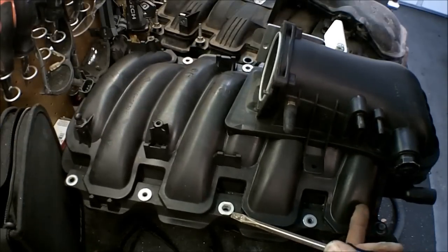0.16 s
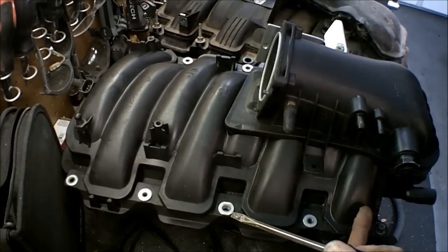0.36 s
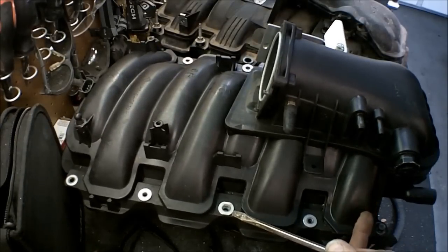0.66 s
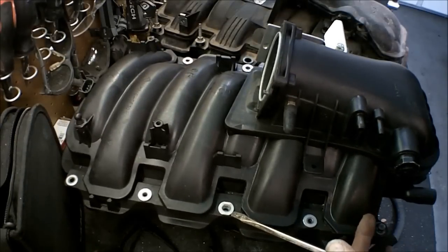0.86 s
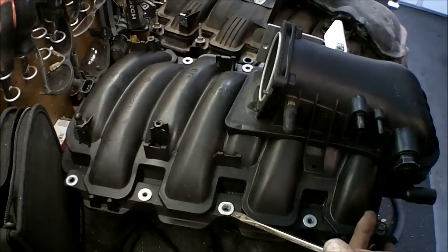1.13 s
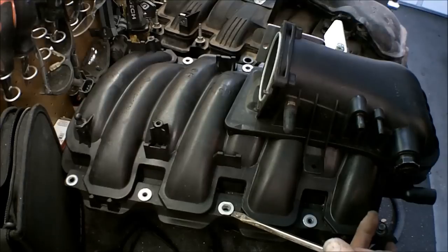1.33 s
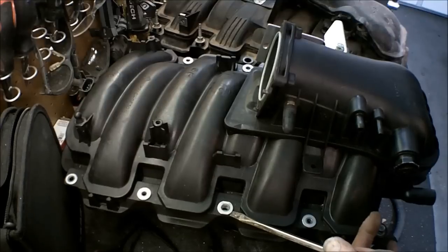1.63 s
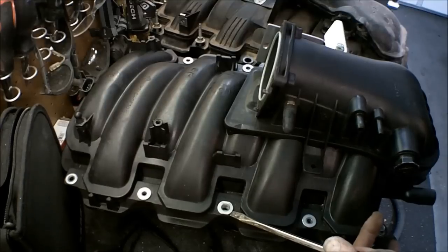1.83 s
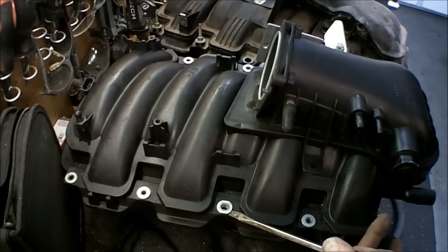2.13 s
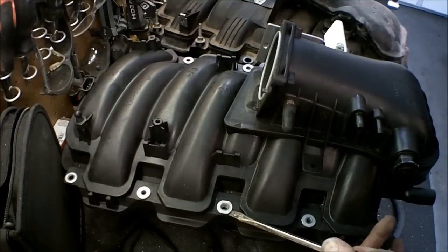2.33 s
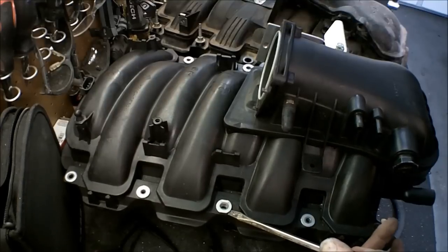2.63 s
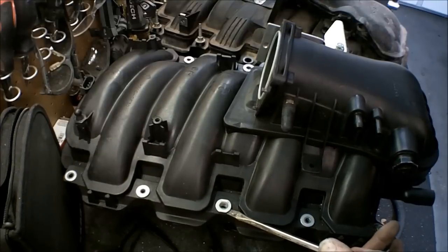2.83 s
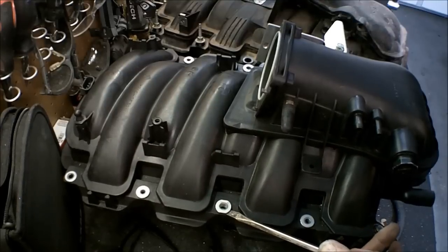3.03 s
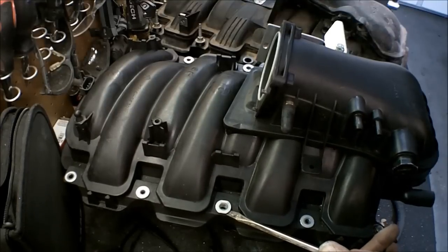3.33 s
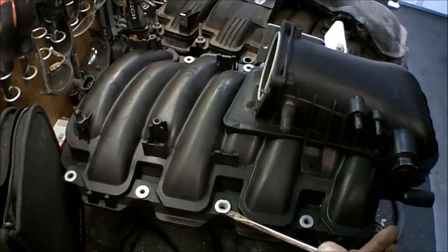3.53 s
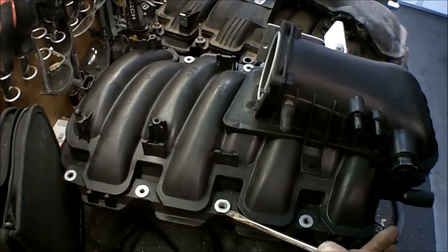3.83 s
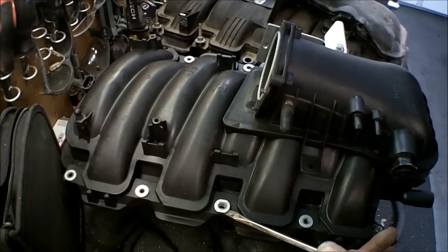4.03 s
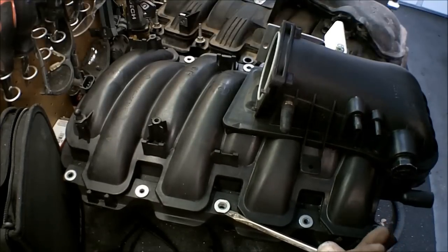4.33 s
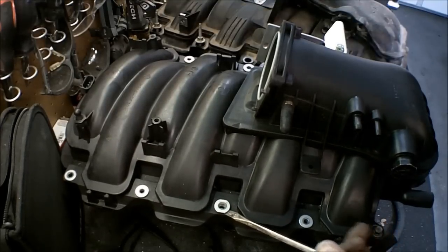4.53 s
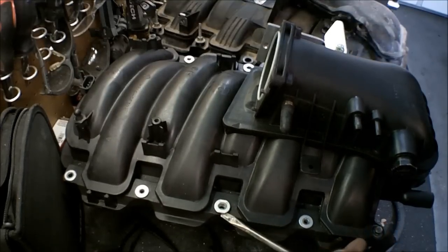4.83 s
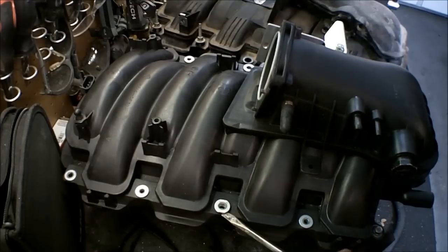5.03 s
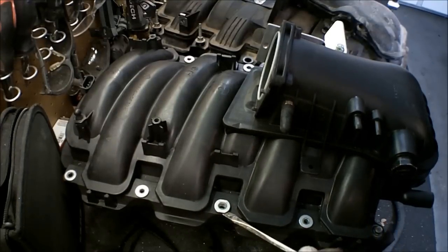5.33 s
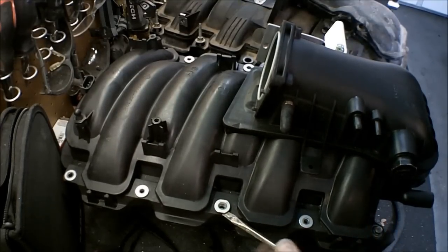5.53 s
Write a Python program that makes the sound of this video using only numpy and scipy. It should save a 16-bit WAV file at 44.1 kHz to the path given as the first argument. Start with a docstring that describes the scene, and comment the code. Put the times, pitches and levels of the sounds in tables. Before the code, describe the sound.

Close, sharp cracks of metal levered out of plastic come in an uneven series, followed by lighter knocks, scraping and a brief shudder.

```python
"""A small workshop: at the bench, a screwdriver levers a steel sleeve out of a plastic intake manifold.
The sleeve gives way in loud snaps, each a crack plus the ringing modes of shell, sleeve and blade.
A limiter ducks each snap and lets the room swell back. Between snaps the blade knocks and scrapes;
near the end it slips off and the manifold rocks and shudders on the bench. Air and mains hum lie below."""
import sys
import numpy as np
from scipy import signal
from scipy.fft import rfft, irfft
from scipy.io import wavfile
from scipy.ndimage import uniform_filter1d, minimum_filter1d

SR = 44100
rng = np.random.default_rng(int(sys.argv[2]) if len(sys.argv) > 2 else 0)


def master(y):
    """Save y as 16-bit WAV."""
    cut = np.clip(np.atleast_2d(y).T, -1, 1)
    pcm = np.round(cut * 32767)  # scale
    wavfile.write(sys.argv[1], SR, pcm.astype(np.int16))


N = 250484


def amp(db):
    """Decibels to gain."""
    return 10 ** (np.asarray(db) / 20)


def unit_rms(x):
    """Scales to rms 1."""
    return x / np.sqrt(np.mean(x ** 2) + 1e-20)


def curve_at(points, hz):
    """Interpolates over log frequency."""
    points_hz, values = np.transpose(points)
    return np.interp(np.log(hz + 1), np.log(points_hz + 1), values)


def add(mix, start_s, sound):
    """Mixes a sound in at start_s."""
    part = mix[max(round(start_s * SR), 0):][:len(sound)]
    part += sound[:len(part)]


def coloured(x, gain_db, size=4096):
    """Minimum-phase filter with response gain_db(hz)."""
    log_gain = np.log(amp(gain_db(abs(np.fft.fftfreq(size, 1 / SR)))))
    taps = np.fft.ifft(np.exp(np.conj(signal.hilbert(log_gain)))).real[:size // 2]
    fade = signal.windows.tukey(size, .5)[size // 2:]
    return signal.oaconvolve(x, taps * fade)[:len(x)]


def ringing(modes, t):
    """One decaying sine per mode, as rows."""
    hz, level_db, t60_s = np.transpose(modes)[:, :, None]
    return amp(level_db) * np.exp(-np.log(1000) * t / t60_s) * np.sin(2 * np.pi * hz * t)


# Air noise spectrum: freq_hz, gain_db
AIR_SPECTRUM = [(12, -34), (20, -2.5), (68, 1), (163, -13), (241, -15.5), (399, -20.5), (678, -23.5),
                (2140, -33), (2750, -38.5), (3070, -35), (4180, -31.5), (5530, -41), (15200, -46.5),
                (16000, -64)]
# Mains partials: pitch_hz, level_db
MAINS_HUM = [(59.2, -52), (118.5, -64.5), (237, -66)]


def background(air_db=-50.5):
    """Steady room air and mains hum."""
    air_gain = amp(curve_at(AIR_SPECTRUM, np.fft.rfftfreq(N, 1 / SR)))
    air = irfft(rfft(rng.standard_normal(N)) * air_gain, N)
    t = np.arange(N) / SR
    hum = sum(amp(db) * np.sqrt(2) * np.sin(2 * np.pi * (hz * t + rng.random())) for hz, db in MAINS_HUM)
    return amp(air_db) * unit_rms(air) + hum


def friction(strokes, gain_db, slips_per_s, spread_db, swing_db=20):
    """Tiny uneven slips; each stroke rises swing_db over build_s and falls as much over release_s."""
    sizes = amp(spread_db * np.minimum(rng.exponential(1, N), 4))
    slips = (rng.random(N) < slips_per_s / SR) * rng.choice([-1, 1], N) * sizes
    t = np.arange(N) / SR
    pressure = sum(amp(level_db - swing_db * np.maximum((peak_s - t) / build_s, (t - peak_s) / release_s))
                   for peak_s, level_db, build_s, release_s in strokes)
    return unit_rms(coloured(slips, gain_db)) * pressure


# Contact spectrum: freq_hz, gain_db
CONTACT_SPECTRUM = [(40, -9), (110, -11.5), (190, -6.5), (320, -3), (620, -10.5), (850, -6), (1050, 1),
                    (1450, -2.5), (1750, 0), (3300, -5.5), (4800, -2), (5600, -11), (9000, -22.5),
                    (14000, -21.5)]


def contact_db(hz):
    """Response of the part's dense modes to a contact."""
    return curve_at(CONTACT_SPECTRUM, hz)


# Blade strokes: peak_s, level_db, build_s, release_s
SCRAPE_STROKES = [(0.016, -46.5, 0.022, 0.08), (0.926, -46.5, 0.049, 0.04), (1.1, -56.5, 0.12, 0.25),
                  (4.285, -62, 0.06, 0.15), (4.494, -48.5, 0.0046, 0.38), (4.592, -40.5, 0.022, 0.18),
                  (4.79, -36.5, 0.095, 0.075), (5.052, -45, 0.051, 0.06), (5.607, -33.5, 0.035, 0.07)]


def scrape():
    """The blade sticks and slips across the plastic shell."""
    tilt = [(1500, -4), (4500, 2.5), (9500, -5.5), (13000, -21.5)]  # freq_hz, gain_db
    gain_db = lambda hz: contact_db(hz) + curve_at(tilt, hz)
    return friction(SCRAPE_STROKES, gain_db, slips_per_s=2400, spread_db=3.0)


# Room decay: freq_hz, t60_s
ROOM_DECAY = [(100, 0.48), (300, 0.2251), (1300, 0.4326), (4000, 0.405), (7000, 0.39), (14000, 0.1051)]
# Room response: freq_hz, gain_db
ROOM_SPECTRUM = [(50, -2.5), (112, 13.5), (190, -9), (330, 1.5), (620, -9), (920, 0), (1130, -4.5),
                 (1360, 2.5), (1600, -4.5), (2100, -3.5), (4600, -5), (6500, -14.5), (9000, -13.5),
                 (13000, -26)]


def workshop(x, first_echo_s=0.00043, size=32768):
    """Dense reflections, each band decaying at its own rate."""
    hz, t, bands = signal.stft(rng.standard_normal(size), SR, nperseg=256)
    decay = np.exp(-np.log(1000) * t / curve_at(ROOM_DECAY, hz)[:, None])
    tail = signal.istft(bands * decay, SR, nperseg=256)[1]
    tail *= np.clip(np.arange(len(tail)) / SR / first_echo_s - 1, 0, 1)
    tail = coloured(tail / np.linalg.norm(tail), lambda hz: curve_at(ROOM_SPECTRUM, hz))
    return signal.fftconvolve(x, tail)[:N]


def chatter(t, chatter_s, grit=0.24, edge_hz=7000, size=2048):
    """Whitened micro-impacts that stop as the blade seats; the treble edge dies first."""
    impacts = rng.standard_normal(len(t)) * np.exp(grit * rng.standard_normal(len(t)) - t / chatter_s)
    power = uniform_filter1d(abs(rfft(impacts[:size])) ** 2, size=5)
    bins_hz = np.fft.rfftfreq(size, 1 / SR)
    white = coloured(impacts, lambda hz: -10 * np.log10(np.interp(hz, bins_hz, power) + 1e-9))
    dull = irfft(rfft(white) / (1 + (np.fft.rfftfreq(len(t), 1 / SR) / edge_hz) ** 10), len(t))
    edge = white - dull
    return dull * np.exp(-(t / (10 * chatter_s)) ** 2) + edge * np.exp(-(t / (3 * chatter_s)) ** 2)


# Modes of shell, sleeve and blade: pitch_hz, level_db, t60_s
PART_MODES = [(179, -30, 0.13), (283, -38.5, 0.33), (332, -20.5, 0.007), (772.5, -24, 0.17),
              (952.5, -6, 0.035), (1090, -2, 0.022), (1145, -19, 0.05), (1315, -22, 0.099),
              (1440.5, -2.5, 0.031), (1380, -20, 0.0068), (1700, -20, 0.11), (1955, -6, 0.038),
              (2153, -11.5, 0.048), (2250, -8.5, 0.0022), (3194, -15.5, 0.056), (3345, 2.5, 0.013),
              (3784, -4.5, 0.039), (4158, -7.5, 0.024), (4914, -13, 0.083), (6400, -12.5, .012),
              (6855, -10.5, 0.015)]


def blows(hits, ring_db, room_db, runners_db, room_ring_db=-7, lift_octaves=.13, size=12000):
    """Crack plus modes, coloured by the contact point; the hollow runners sound near 850 Hz."""
    t = np.arange(size) / SR
    direct, to_room = np.zeros(N), np.zeros(N)
    modes = ringing(PART_MODES, t) * (-1) ** np.arange(len(PART_MODES))[:, None]
    for start_s, force_db, thud_db, shell_db, steel_db, edge_db, chatter_s, lift_hz, lift_db in hits:
        crack = unit_rms(coloured(chatter(t, chatter_s), contact_db))
        ring = unit_rms(amp(rng.standard_normal(len(modes))) @ modes)
        hollow_db = (thud_db + shell_db) / 4 + runners_db
        colour = [(350, thud_db), (570, thud_db / 2 - runners_db), (790, hollow_db), (950, hollow_db),
                  (1300, shell_db), (2000, 0), (2500, 0), (4400, steel_db), (10000, edge_db)]
        # Each contact point favours one resonance.
        peak_db = lambda hz: lift_db / (1 + (np.log2((hz + 1) / lift_hz) / lift_octaves) ** 2)
        # The room hears all sides of the part, so single modes stand out less.
        for mix, modes_db in ((direct, ring_db), (to_room, room_ring_db)):
            blow = coloured(crack + amp(modes_db) * ring, lambda hz: curve_at(colour, hz) + peak_db(hz))
            blow *= np.sqrt(0.0096 * SR / np.sum(blow ** 2))  # energy of 9.6 ms at rms 1
            add(mix, start_s, amp(force_db) * blow)
    return direct + amp(room_db) * workshop(to_room)


# Blade knocks: start_s, force_db, hardness_db, chatter_s, lift_hz, lift_db
BLADE_KNOCKS = [(0.3253, -17, -5, 0.013, 925, 1.5), (0.842, -37, -3, 0.011, 740, 20.5),
                (0.93, -27.5, -5, 0.011, 990, 0), (1.024, -37, -7.5, 0.027, 1310, 3),
                (1.2397, -8, -4, 0.0074, 896, 5.5), (4.591, -28, -0.5, 0.055, 3300, 8),
                (4.6214, -9.5, 3.5, 0.0063, 1513, 18.5), (4.63, -18, 12.5, 0.0036, 1450, 15),
                (4.701, -25, 3, 0.0088, 1900, 1), (4.779, -20, -0.5, 0.0045, 1490, 15.5),
                (4.976, -37, -4, 0.01, 940, 0), (4.988, -39.5, -3, 0.0017, 1220, 26),
                (5.0253, -21, -1, 0.0086, 1606, 11.5), (5.308, -50.5, 6.5, 0.0019, 4050, 10),
                (5.3302, -33, 0.5, 0.011, 1930, -3), (5.3635, -37, 4, 0.0019, 2065, 12.5),
                (5.571, -35, -1, 0.012, 810, 15), (5.584, -24.5, -2, 0.038, 1620, 1.5),
                (5.599, -11.5, 2.5, 0.0047, 1570, 8.5)]
# Knock colour, rows thud, shell, steel, edge: base_db, db_per_hardness_db
KNOCK_BANDS = [(-0.5, -1.65), (-7.5, -1.43), (-5, 0.87), (-16.5, 1.8)]


def knocks():
    """The blade hits plastic or steel; a harder touch trades thud and shell for steel and edge."""
    hits = []
    for start_s, force_db, hardness_db, chatter_s, lift_hz, lift_db in BLADE_KNOCKS:
        bands_db = [base_db + slope * hardness_db for base_db, slope in KNOCK_BANDS]
        hits.append((start_s, force_db, *bands_db, chatter_s, lift_hz, lift_db))
    return blows(hits, ring_db=-2.5, room_db=-8, runners_db=2.54)


# Sleeve slips: start_s, force_db, shell_db, steel_db, lift_hz, lift_db
SLEEVE_SNAPS = [(0.4211, 4, -7.5, 3.5, 2100, 5.5), (1.5647, 15.5, 5.5, -5, 1085, 5),
                (2.0410, 15.5, 8.5, 0, 1097, 2), (2.4151, 15.5, 3.5, -1.5, 1065, 7.5),
                (2.7749, 16.5, -6, 5, 938, 8.5), (3.3772, 13.5, 1.5, 4.5, 1110, 8.5),
                (3.6501, 14, 6.5, 1, 1750, 2.5), (3.8627, 13, 7, -2, 1670, 0)]


def snaps(full_force_db=16.5, full_chatter_s=0.0031, db_per_halving=15.5):
    """The sleeve gives way; more force means shorter chatter, more thud and more edge."""
    hits = []
    for start_s, force_db, shell_db, steel_db, lift_hz, lift_db in SLEEVE_SNAPS:
        excess_db = force_db - full_force_db
        thud_db = 1.24 + 0.8 * excess_db + 0.55 * shell_db
        edge_db = -0.5 + 0.7 * excess_db + 0.83 * steel_db
        chatter_s = full_chatter_s * 2 ** (-excess_db / db_per_halving)
        hits.append((start_s, force_db, thud_db, shell_db, steel_db, edge_db, chatter_s, lift_hz, lift_db))
    return blows(hits, ring_db=-1.0, room_db=-14.0, runners_db=-2)


# Drops onto the bench: start_s, level_db, lowest_mode_db
BENCH_BUMPS = [(4.624, -23.5, -13), (4.653, -27, 16.5), (4.772, -31.5, 29), (4.787, -23, -5),
               (4.819, -29.5, -16), (5.025, -36, -6)]
# Modes of the manifold on the bench: pitch_hz, level_db, t60_s
BENCH_MODES = [(48.8, -14.5, 0.43), (84.8, -7, 0.1), (114.6, 5, 0.14), (159.6, -2.5, 0.18),
               (198.5, -2, 0.35), (244, -5, 0.17), (509, 4.5, 0.066)]


def bumps(size=20000):
    """The manifold rocks; each landing rings its low modes on the bench."""
    modes = ringing(BENCH_MODES, np.arange(size) / SR)
    mix = np.zeros(N)
    for start_s, level_db, lowest_mode_db in BENCH_BUMPS:
        thud = amp(lowest_mode_db) * modes[0] + modes[1:].sum(0)
        add(mix, start_s, amp(level_db) * thud)
    return mix


# Manifold slides: peak_s, level_db, build_s, release_s
SHUDDER_STROKES = [(4.695, -22, 0.088, 0.032), (4.782, -23, 0.019, 0.083)]
# Bench friction spectrum: freq_hz, gain_db
SHUDDER_SPECTRUM = [(30, -21), (120, 5), (230, 3.5), (400, -2.5), (900, -9), (1450, -3), (2400, -3),
                    (4500, -13.5), (6500, -30), (9500, -36), (14500, -42)]


def shudder():
    """The manifold sticks and slips across the bench top."""
    gain_db = lambda hz: curve_at(SHUDDER_SPECTRUM, hz)
    return friction(SHUDDER_STROKES, gain_db, slips_per_s=5100, spread_db=3.5)


def scene():
    """Tool and manifold close by in a small hard room, mono."""
    impacts = snaps() + knocks()
    rubbing = scrape() + shudder()
    rubbing_echo = amp(-7) * workshop(rubbing)
    return (impacts + rubbing + rubbing_echo + bumps() + background())[None]


# Microphone response: freq_hz, gain_db
MIC_RESPONSE = [(15, -10.5), (40, -1.5), (13000, -1), (14800, -5), (16000, -7.5)]
# Microphone port notches: centre_hz, width_hz, gain_db
PORT_NOTCHES = [(2682, 231, -20), (5418, 360, -19), (7854, 820, -20.5), (10820, 380, -19.5)]


def microphone_db(hz):
    """Roll-off at both ends, plus the port notches."""
    notches_db = sum(gain_db / (1 + ((hz - centre_hz) / (width_hz / 2)) ** 2)
                     for centre_hz, width_hz, gain_db in PORT_NOTCHES)
    return curve_at(MIC_RESPONSE, hz) + notches_db


def limiter(x, threshold_db=-8, slope=0.68, recovery_db_per_s=190, hold_samples=44):
    """Gain drops at once on a peak and climbs back steadily, lifting the echo."""
    demand_db = slope * np.maximum(20 * np.log10(abs(x) + 1e-9) - threshold_db, 0)
    climb_db = np.arange(N) / SR * recovery_db_per_s
    cut_db = np.maximum.accumulate(demand_db + climb_db) - climb_db
    held_gain_db = minimum_filter1d(-cut_db, hold_samples)
    return x * amp(uniform_filter1d(held_gain_db, hold_samples))


def record(dry):
    """Microphone, limiter, full-scale clip, 15.9 kHz low-pass."""
    picked_up = coloured(dry[0], microphone_db)
    clipped = np.clip(limiter(picked_up), -1, 1)
    lowpass = signal.firwin(255, 15900, window=("kaiser", 9), fs=SR)
    return signal.oaconvolve(clipped, lowpass, "same")[None]


dry = scene()
out = record(dry)
master(out)
```